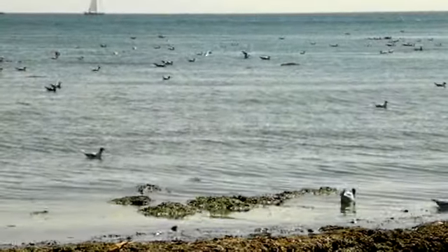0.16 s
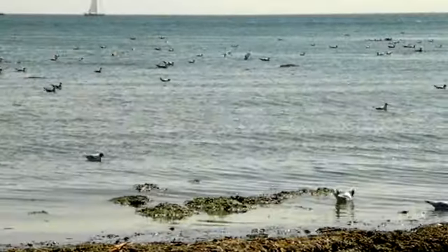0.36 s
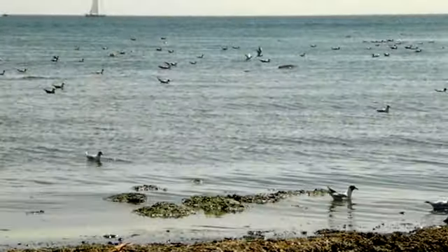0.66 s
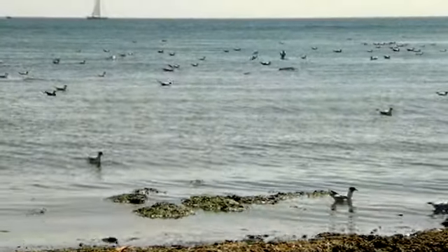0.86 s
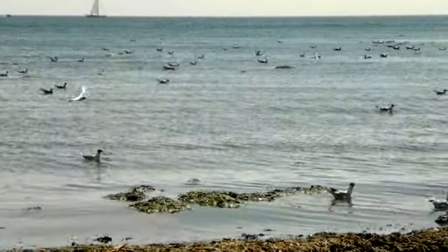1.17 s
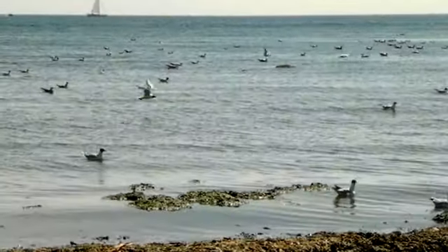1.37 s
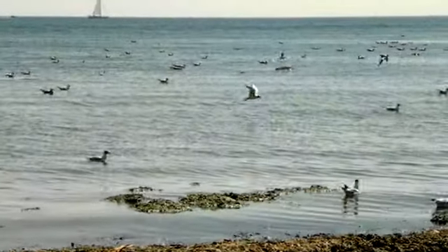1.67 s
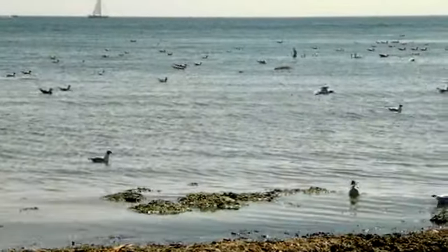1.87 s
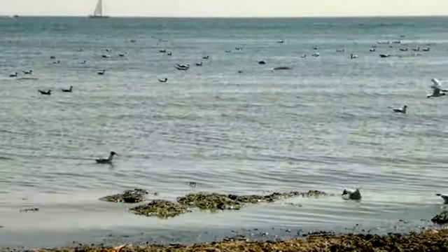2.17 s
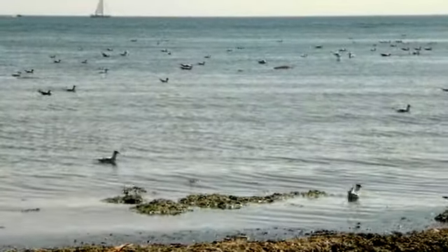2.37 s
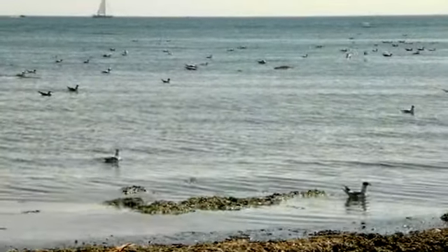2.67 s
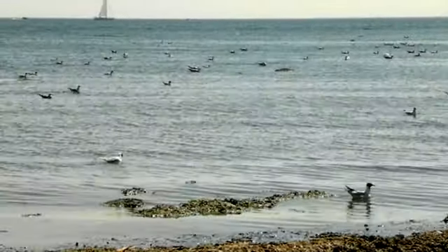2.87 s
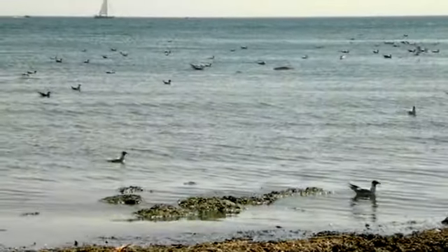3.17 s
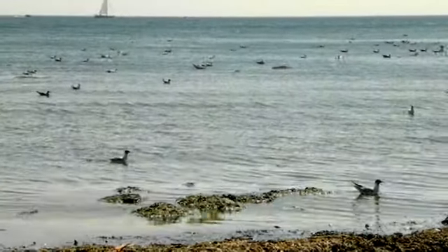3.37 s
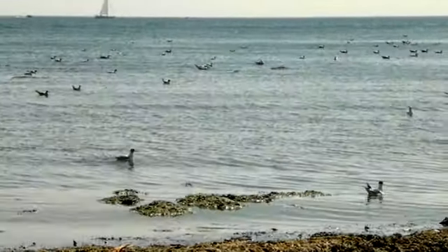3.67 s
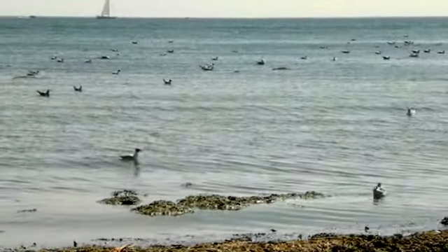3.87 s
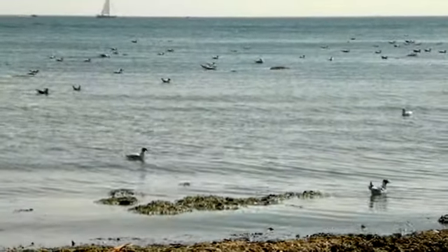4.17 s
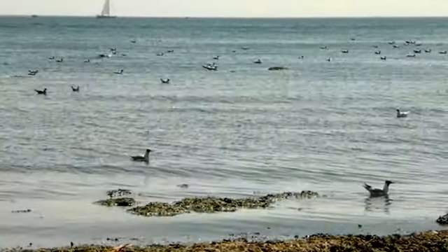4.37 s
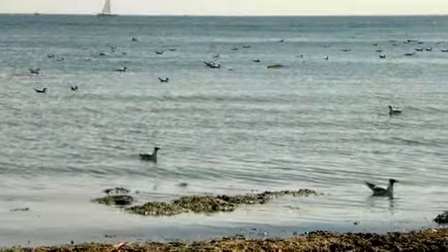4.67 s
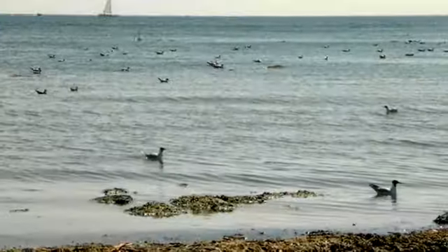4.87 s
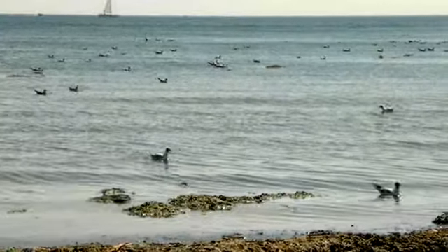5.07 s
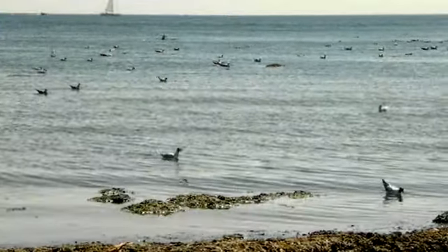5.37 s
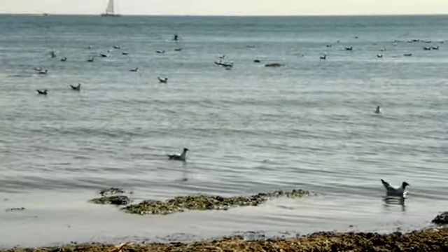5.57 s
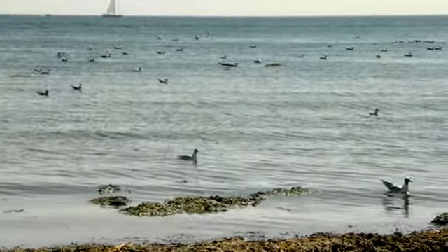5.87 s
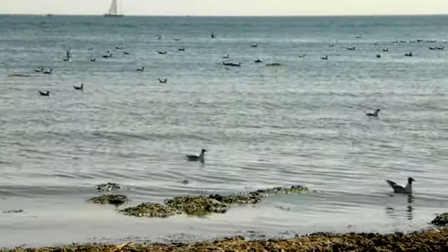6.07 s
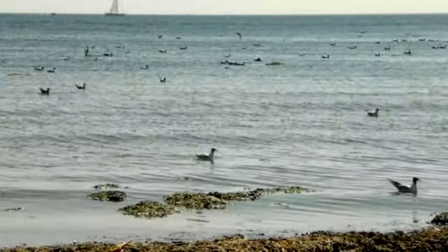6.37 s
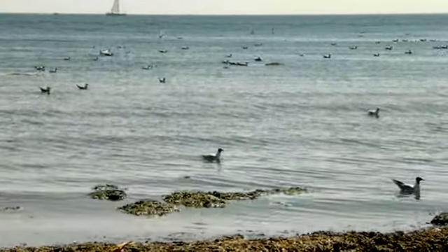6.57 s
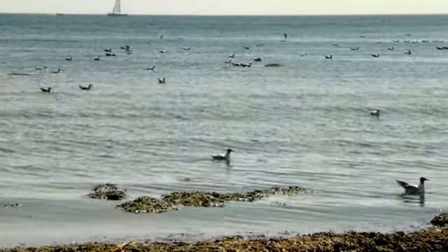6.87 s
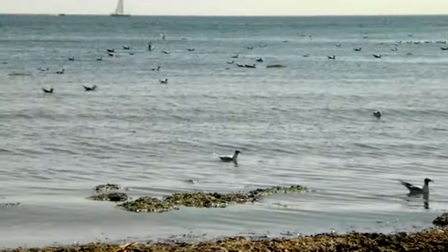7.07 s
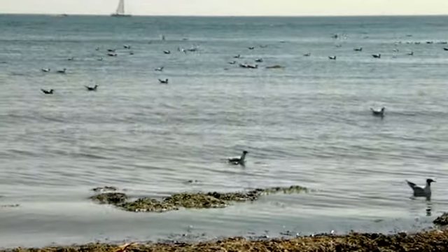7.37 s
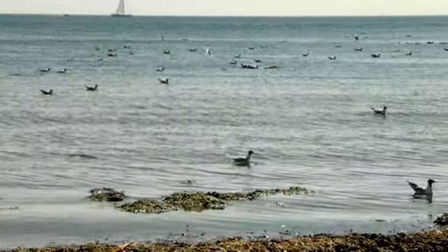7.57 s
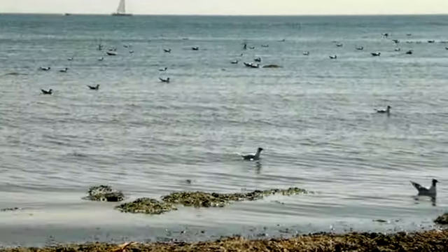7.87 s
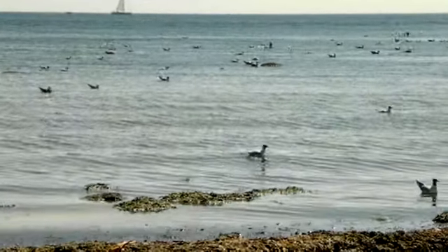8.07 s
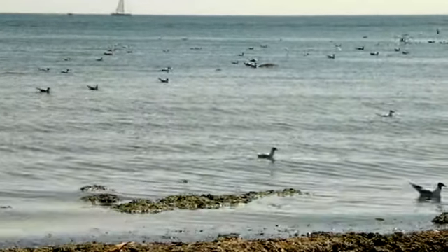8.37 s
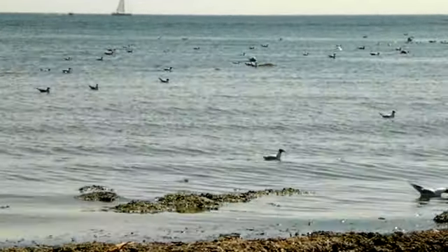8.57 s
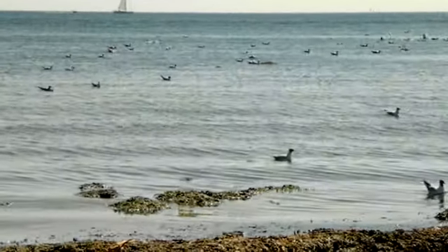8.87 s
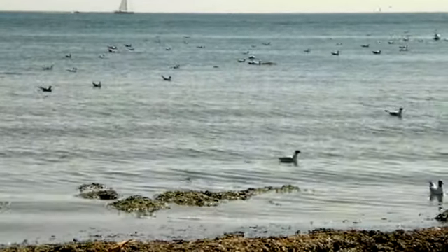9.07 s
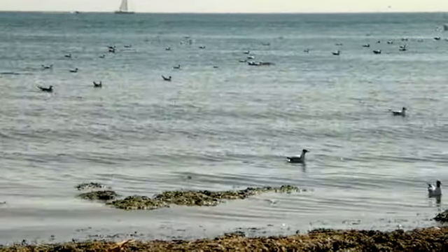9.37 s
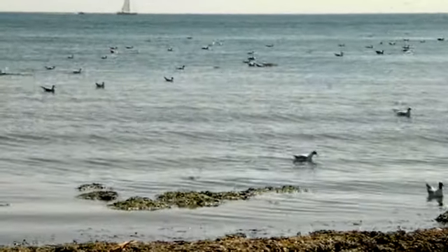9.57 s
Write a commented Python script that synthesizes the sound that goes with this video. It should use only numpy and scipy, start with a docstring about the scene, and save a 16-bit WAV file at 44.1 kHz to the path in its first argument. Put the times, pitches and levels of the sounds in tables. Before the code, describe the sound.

Harsh gull calls and high squeals carry over gentle shore ripples, while nearby stones knock sharply a few times.

```python
"""Gulls on calm sea off a pebble beach: rattling cries, a long laugh, a trill, barks and nasal wails,
with the whistles, squeals and hisses of young birds. The syrinx pulses to make the rattle; throat and
bill resonances shape the overtones. Hisses are air through a narrow throat. A few pebbles knock close by.
Behind: the far flock, ripples washing the shore and light wind on the microphone."""
import sys
import numpy as np
from scipy import signal
from scipy.fft import rfft, irfft, next_fast_len
from scipy.io import wavfile
from scipy.ndimage import uniform_filter1d, map_coordinates

SR = 44100
rng = np.random.default_rng(int(sys.argv[2]) if len(sys.argv) > 2 else 0)


def dump(signal):
    """Clip the signal to [-1, 1] and save it as 16-bit WAV at the path in sys.argv[1]."""
    limited = np.clip(np.atleast_2d(signal).T, -1, 1)
    pcm = np.round(limited * 32767).astype(np.int16)
    wavfile.write(sys.argv[1], SR, pcm)


N = 428211

# rattling cries: (time [s], length [s], attack [s], level [dB], 2nd harmonic at start [Hz], middle [Hz],
# end [Hz], rattle [Hz], pitch swing [ratio], roughness [0-1], brightness [dB])
CRIES = [(0.783, 0.28, 0.2, -40.5, 1913, 2060, 1895, 69.8, 0.13, 0.34, 4),
         (0.99, 0.15, 0.019, -35.5, 1796, 1718, 1674, 72.3, 0.095, 0.23, -7),
         (1.367, 0.2, 0.0088, -35, 1700, 1802, 1710, 74.3, 0.26, 0.16, -38),
         (3.242, 0.38, 0.056, -40.5, 1883, 1996, 1721, 69.6, 0.034, 0.24, 4.5),
         (3.344, 0.18, 0.046, -37.5, 1920, 2050, 1920, 66.8, .025, 0.14, 15.5),
         (6.689, 0.23, .02, -34.5, 2164, 1990, 1966, 66.2, 0.17, 0.29, 4),
         (6.799, .22, 0.03, -30.5, 1790, 1662, 1620, 66.2, 0.065, 0.18, -29),
         (7.03, 0.17, 0.032, -35, 1640, 1906, 1985, 81, 0.03, 0.25, 8),
         (7.181, 0.12, 0.011, -47, 1830, 1698, 1470, 80.3, 0.017, 0.09, 9.5),
         (9.087, 0.27, 0.058, -41.5, 1846, 1892, 1770, 97.7, 0.071, 0.14, -32)]
# nearest gull's laugh: (time [s], 2nd harmonic [Hz], relative level [dB])
LAUGH = [(4.65, 2084, -47), (4.682, 1780, -31.5), (4.712, 2037, -31), (4.768, 2247, -31.5),
         (4.792, 1780, -34), (4.83, 1998, -23.5), (4.86, 1905, -25.5), (4.869, 2053, -36),
         (4.884, 2106, -26), (4.938, 2124, -23.5), (4.951, 1845, -33), (4.971, 2042, -25.5),
         (4.981, 2086, -30.5), (4.995, 1928, -23.5), (5.025, 2280, -27), (5.05, 1985, -27),
         (5.105, 1840, -49)]
# throat and bill response: (frequency [Hz], gain [dB])
THROAT = [(250, -42), (900, -17), (1250, -28.5), (1600, 0), (2250, 6.5), (2900, -10.5), (3400, -2),
          (4400, -8.5), (5200, -23), (6700, -19), (9500, -28.5), (14000, -50)]
# sharper resonances with the bill wide open: (frequency [Hz], gain [dB])
OPEN_BILL = [(400, -20), (1700, 8), (2250, -2.5), (2700, -12), (3450, 0), (4050, -6.5), (4600, 0.5)]
# falling trill: (time [s], pitch [Hz], level [dB], pitch swing [ratio])
TRILL = [(7.758, 2010, -28.5, 0.23), (7.89, 2180, -25, 0.2), (8.05, 2035, -28.5, 0.096),
         (8.12, 1840, -35.5, .1), (8.19, 1470, -54, 0.078)]
# barks and yaps: (time [s], hold [s], pitch [Hz], level [dB])
BARKS = [(0.224, 0.036, 1090, -38), (1.15, 0.033, 824, -25), (1.56, 0.017, 1150, -29),
         (3.961, 0.035, 1050, -39), (4.157, 0.022, 957, -35.5), (4.331, 0.035, 1100, -49),
         (4.424, 0.038, 1080, -42.5), (5.869, 0.034, 924, -25), (6.516, 0.031, 1014, -25.5),
         (6.648, 0.032, 868, -21), (7.361, 0.013, 1140, -38.5), (7.624, 0.023, 871, -25.5),
         (8.94, 0.038, 926, -22)]
# nasal wails: (throat resonance [Hz], rows of (time [s], pitch [Hz], level [dB]))
WAILS = [(2010, [(2.58, 302, -41), (2.65, 321, -39), (2.74, 321, -40), (2.77, 305, -44), (2.87, 308.3, -44),
         (2.93, 330, -47)]), (2130, [(7.92, 352.3, -40), (8.15, 364, -35), (8.47, 358.2, -38.5),
         (8.58, 371, -41.5), (8.67, 352, -51)]), (2080, [(9.24, 353, -53), (9.29, 357, -39),
         (9.5, 390, -35.5), (9.56, 415.4, -31.5), (9.71, 403.6, -34)])]
# whistles: (time [s], length [s], level [dB], pitch at start [Hz], middle [Hz], end [Hz], octave [dB])
WHISTLES = [(0.197, 0.52, -42.5, 2233, 2150, 1945, -37), (0.409, 0.34, -49, 3880, 4210, 4090, -24),
            (0.51, 0.1, -59, 5570, 5560, 5560, -30), (1.03, 0.36, -53.5, 4640, 4420, 4100, 1.5),
            (1.561, 0.032, -29.5, 2280, 2390, 2580, -12), (2.062, 0.12, -42.5, 2200, 2125, 1930, -18),
            (3.101, 0.08, -41, 2260, 2190, 2010, -24), (4.062, 0.1, -43.5, 4270, 4100, 3900, -29),
            (4.53, 0.11, -48.5, 3380, 3670, 3900, -19), (5.301, 0.52, -55, 2935, 2720, 2560, -30),
            (5.891, 0.16, -42.5, 2180, 1970, 1880, -26), (6.397, 0.44, -52.5, 4620, 4640, 4200, 0),
            (7.384, 0.32, -42, 3840, 3954, 3770, -28), (8.521, .295, -38, 4000, 4066, 3650, -21)]
# breaking squeals, one list each: (time [s], pitch [Hz], relative level [dB])
SQUEALS = [
    [(1.548, 3520, -32), (1.585, 3640, -44), (1.62, 4340, -33.5), (1.651, 4870, -44), (1.681, 4300, -31.5),
     (1.718, 4380, -33.5), (1.806, 3370, -40)],
    [(8.457, 4200, -41), (8.476, 3790, -42), (8.502, 4390, -29), (8.515, 4950, -43), (8.554, 5150, -41),
     (8.58, 4590, -32), (8.608, 4810, -38), (8.634, 4390, -27), (8.748, 3520, -46.5)],
]
# begging rasps and faint thin hisses: (time [s], length [s], level [dB], throat tuning [ratio])
RASPS = [(2.89, 0.32, -37, 1.02), (7.455, 0.31, -37, 1.01)]
HISSES = [(2.24, 0.68, -53, 1.04), (4.93, 1, -52, 0.99), (8.14, 0.48, -56, .84)]
# their throat spectra before tuning: (frequency [Hz], gain [dB])
RASP_SPECTRUM = [(1000, -20), (2100, 4), (3100, -16.5), (3800, -21), (4700, -6.5), (5200, -10), (5700, 5),
                 (6300, -16), (6700, -3), (7800, -12), (9300, -5), (10700, -13.5), (12500, -33)]
HISS_SPECTRUM = [(1500, -11), (4000, 4), (6700, -2), (9600, -6), (10400, 1), (11300, -8), (13500, -26)]
# pebble knocks: (time [s], level [dB], body note [Hz], hard modes and crack re body [dB])
KNOCKS = [(2.1825, -11, 625, 8.5), (2.581, -11, 1090, 7.5), (2.584, -17.5, 910, 3.5),
          (5.3924, -15, 840, 2.5), (5.783, -21.5, 780, -19)]
# hard pebble modes: (frequency [Hz], gain [dB], T60 [s])
PEBBLE_MODES = [(1450, -13, 0.01), (2130, -6.5, 0.018), (2456, -6, 0.013), (3660, -1, 0.0012),
                (8100, -10.5, 0.0027)]
# excited bouts of the far flock: (time [s], length [s], relative level [dB])
FLOCK_BOUTS = [(0.3, 1.33, -56), (3.33, 0.87, -44), (6.603, 1.43, -50)]
# shore wash: (time [s], relative level [dB])
WASH = [(0.0, -49.5), (0.57, -50.5), (0.97, -45.5), (1.73, -52), (3.16, -54), (3.92, -45.5), (4.19, -52),
        (6.71, -49.5), (8.9, -51.5), (9.71, -47.5)]
# wind gusts: (peak time [s], Gaussian sigma [s], level [dB])
GUSTS = [(2.3, 0.58, -50), (7.8, 0.6, -57), (9.7, 0.42, -56)]
# water and wind spectra: (frequency [Hz], gain [dB])
SEA_SPECTRUM = [(195, -24.5), (290, -10), (550, -7), (850, 1), (1300, -1.5), (2000, 5), (3000, -7),
                (6000, -20.5), (11000, -26.5)]
WIND_SPECTRUM = [(25, -17.5), (70, -2.5), (120, -1.5), (190, -20), (310, -9), (600, -17.5), (1500, -61)]


def cries(depth=0.68, release_share=0.27, fade_db=8.5):
    """Rattling cries: the throat favours the 2nd harmonic; pitch swing shrinks as effort dies."""
    out = np.zeros(N)
    for start_s, length_s, attack_s, db, *contour_hz, rattle_hz, swing, rough, bright_db in CRIES:
        effort = amp(envelope_db(length_s, attack_s, release_share * length_s, fade_db))
        pitch_hz = glide(len(effort), *contour_hz) / 2
        cry = voice(pitch_hz, rattle_hz, depth, swing * np.sqrt(effort), rough, bright_db)
        add(out, start_s, cry * effort * amp(db))
    return out


def voice(pitch_hz, rattle_hz, depth, swing, rough, bright_db, harmonics=10, uneven=0.042):
    """Harsh gull voice: pitch arches within each pulse and jitters as the membranes go chaotic."""
    n = len(pitch_hz)
    cycle, pulse = rattle(n, rattle_hz, depth, uneven)
    arch = np.sin(np.pi * cycle ** 1.9)
    jitter = .11 * (wander(n, 900) + wander(n, 110))
    phase = phase_rad(pitch_hz * (1 + swing * (arch - arch.mean()) + rough * jitter))
    odd_gain = np.minimum(3 * rough, 1)  # rough cycles alternate, filling in odd harmonics
    air = 2.6 * rough * rng.standard_normal(n)
    tone = sum(odd_gain ** (k % 2) * np.sin(k * phase) for k in range(1, harmonics + 1))
    cry = unit(colour((tone + air) * pulse, THROAT))
    # a wider bill passes more upper overtones
    return colour(cry, [(2500, 0), (3100, bright_db), (4600, bright_db), (5800, min(bright_db, 0) / 2)])


def rattle(n, rate_hz, depth, uneven=0.095):
    """The syrinx opens in quick pulses. Returns (position in pulse [0-1], gain)."""
    cycle = np.cumsum(rate_hz * (1 + uneven * wander(n, 56.6))) / SR % 1
    pulse = 1 - depth + depth * np.sin(np.pi * cycle)
    return cycle, pulse * amp(1.03 * wander(n, 78.9))


def laugh(gain_db=2, rattle_hz=91.7, crack_db=-24, rough_per_db=0.1):
    """Nearest gull: deep pulses, heaving pitch; the voice cracks where effort sags."""
    out = np.zeros(N)
    start_s, second_hz, db = curves(LAUGH)
    rough = np.clip(rough_per_db * (crack_db - db), .15, .33)
    cry = voice(second_hz / 2, rattle_hz, depth=1, swing=.16, rough=rough, bright_db=-10, uneven=.012)
    add(out, start_s, colour(cry, OPEN_BILL) * amp(db + gain_db))
    return out


def trill(rattle_hz=80, depth=0.66, skew=0.51, jitter=0.0143, overtones_db=-36):
    """Even, clear pulses, each a pitch stroke loudest early; strokes flatten as the voice sinks."""
    out = np.zeros(N)
    start_s, pitch_hz, db, swing = curves(TRILL)
    cycle, _ = rattle(len(db), rattle_hz, depth, uneven=0.018)
    stroke = -swing / 2 * np.cos(2 * np.pi * (cycle - .1))
    phase = phase_rad(pitch_hz * (1 + stroke + jitter * wander(len(db), 700)))
    tone = np.sin(phase) + amp(overtones_db) * (np.sin(2 * phase) + np.sin(3 * phase))
    pulse = 1 - depth + depth * np.sin(np.pi * cycle ** skew) ** 2
    add(out, start_s, unit(tone * pulse) * amp(db))
    return out


def barks(fall_per_s=1.2, release_s=.012, tail_s=0.0426):
    """A few hard pulses; the voice sinks and dies."""
    out = np.zeros(N)
    for start_s, hold_s, middle_hz, db in BARKS:
        t = np.arange(int((hold_s + tail_s) * SR)) / SR
        pitch_hz = middle_hz * np.exp(-fall_per_s * (t - hold_s / 2))
        bark = voice(pitch_hz, rattle_hz=88, depth=.85, swing=.12, rough=.36, bright_db=0.5)
        decay = np.exp(-np.maximum(t - hold_s, 0) / release_s)
        add(out, start_s, bark * amp(db) * decay, fade_s=0.0071)
    return out


def wails(jitter=0.0053, hoarse_jitter=0.031, break_hz=389, width_hz=410):
    """Low voices: only harmonics near the throat resonance escape; hoarse when pushed high."""
    out = np.zeros(N)
    for throat_hz, rows in WAILS:
        start_s, smooth_hz, db = curves(rows)
        shake = jitter + hoarse_jitter / (1 + np.exp((break_hz - smooth_hz) / 10))
        pitch_hz = smooth_hz * (1 + shake * wander(len(db), 380))
        phase = phase_rad(pitch_hz)
        tone = np.zeros(len(db))
        for k in range(2, 9):
            detune = (k * pitch_hz - throat_hz) / width_hz
            tone += np.sin(k * phase + k * k) / (1 + detune ** 2) ** 2
        add(out, start_s, unit(tone) * amp(db))
    return out


def whistles(droop=.055, droop_s=0.0302, waver=0.0044, waver_db=2, waver_hz=35):
    """Thin, arching whistles that waver, then droop as the air runs out."""
    out = np.zeros(N)
    for start_s, length_s, level_db, *contour_hz, octave_db in WHISTLES:
        db = level_db + envelope_db(length_s, 0.29 * length_s, 0.14 * length_s, fade_db=9)
        n = len(db)
        sag = droop * np.exp((np.arange(n) / SR - length_s) / droop_s)
        pitch_hz = glide(n, *contour_hz) * (1 + waver * wander(n, waver_hz) - sag)
        db += waver_db * wander(n, waver_hz)
        add(out, start_s, young_voice(pitch_hz, db, octave_db))
    return out


def squeals(gain_db=1.5, octave_db=-30, break_s=.045, width_s=.06):
    """A young voice forced until it breaks: rough on the climb, clear on the fall."""
    out = np.zeros(N)
    for rows in SQUEALS:
        start_s, pitch_hz, db = curves(rows)
        t = np.arange(len(db)) / SR
        rough = .035 * np.exp(-((t - break_s) / width_s) ** 2)
        add(out, start_s, young_voice(pitch_hz, db + gain_db, octave_db, rough))
    return out


def young_voice(pitch_hz, db, octave_db, rough=0, jitter=0.0028, flutter_db=2):
    """Quavering tone plus its octave; rasps when forced."""
    n = len(db)
    quaver = 1 + jitter * wander(n, 350.5) + rough * wander(n, 1800)
    phase = phase_rad(uniform_filter1d(pitch_hz, size=200) * quaver)
    tone = np.sqrt(2) * (np.sin(phase) + amp(octave_db) * np.sin(2 * phase))
    return tone * amp(db + flutter_db * wander(n, 87.2))


def hisses(rows, spectrum, attack_s, release_s, rattle_hz, depth, arch=.07):
    """Toneless air through a narrow throat whose resonances rise and sink with the call."""
    out = np.zeros(N)
    for start_s, length_s, level_db, tuning in rows:
        db = level_db + envelope_db(length_s, attack_s, release_s, fade_db=19)
        n = len(db)
        _, pulse = rattle(n, rattle_hz, depth)
        air = colour(rng.standard_normal(2 * n), spectrum)
        speed = tuning * glide(n, 1 - arch, 0.99, 1 - arch)
        air = map_coordinates(air, [np.cumsum(speed)])  # read speed shifts the resonances
        add(out, start_s, unit(air * pulse ** 2) * amp(db))
    return out


def pebbles(body_t60_s=0.012, crack_db=-14, crack_s=0.0011):
    """Stones knock together: hollow body note, short hard modes and a crack."""
    out = np.zeros(N)
    t = np.arange(int(.04 * SR)) / SR

    def ring(hz, t60_s):
        return np.sin(2 * np.pi * hz * t) * np.exp(-np.log(1000) * t / t60_s)

    hard = sum((-1) ** k * amp(db) * ring(hz, t60_s) for k, (hz, db, t60_s) in enumerate(PEBBLE_MODES))
    for start_s, db, body_hz, hard_db in KNOCKS:
        crack = amp(crack_db) * rng.standard_normal(len(t)) * np.exp(-t / crack_s)
        knock = ring(body_hz, body_t60_s) + amp(hard_db) * (hard + crack)
        add(out, start_s, amp(db) * knock, fade_s=0)
    return signal.sosfilt(signal.butter(3, [330, 10500], "band", fs=SR, output="sos"), out)


def far_flock(calls=75, base_hz=950, spread=.15, distance_db=11):
    """Far birds at varied distances, short yaps to long cries, each an arch in pitch and level."""
    out = np.zeros(N)
    for k, (offset, length, height, rate, distance) in enumerate(rng.random((calls, 5))):
        length_s = .1 + .4 * length
        arch = np.sin(np.linspace(0, np.pi, int(length_s * SR)))
        pitch_hz = base_hz * (1 + spread * (2 * height - 1)) * (.86 + .18 * arch)
        rattle_hz = 65 + 40 * rate
        cry = voice(pitch_hz, rattle_hz, depth=0.74, swing=0.028, rough=0.12, bright_db=-2, harmonics=5)
        start_s = (k + offset) / calls * N / SR
        add(out, start_s, arch * cry * amp(-distance_db * distance))
    return unit(out)


def excitement(calm_db=-51.5):
    """Far-flock gain: a calm murmur with excited bouts on top."""
    gain = np.full(N, amp(calm_db))
    for start_s, length_s, db in FLOCK_BOUTS:
        swell_db = envelope_db(length_s, attack_s=0.25, release_s=0.04, fade_db=-3)  # ends 3 dB up
        add(gain, start_s, amp(db + swell_db), fade_s=0.09)
    return gain


def ripples(flicker_db=2.15, bubble_db=-9, bubbles_per_s=250):
    """Ripples wash the shore: a soft rush with small bursting bubbles."""
    bubbles = (rng.random(N) < bubbles_per_s / SR) * rng.standard_normal(N)
    rush = rng.standard_normal(N) * amp(flicker_db * wander(N, 18))
    return unit(colour(rush + amp(bubble_db) * unit(bubbles), SEA_SPECTRUM))


def wind(breeze_db=-69.5):
    """A breeze rumbles on the microphone; Gaussian gusts add in power."""
    t = np.arange(N) / SR
    power = amp(breeze_db) ** 2
    for peak_s, sigma_s, db in GUSTS:
        power += (amp(db) * np.exp(-.5 * ((t - peak_s) / sigma_s) ** 2)) ** 2
    return unit(colour(rng.standard_normal(N), WIND_SPECTRUM)) * np.sqrt(power)


def beach_scatter(x, scatter_db=-17, t60_s=0.096, delay_s=.002):
    """Water and shingle scatter a short, dull tail."""
    t = np.arange(int(.3 * SR)) / SR
    noise = colour(rng.standard_normal(len(t)), [(3000, 16), (10000, -29)])
    tail = noise * np.exp(-np.log(1000) * t / t60_s) * (t > delay_s)
    return x + amp(scatter_db) * signal.fftconvolve(x, tail / np.linalg.norm(tail))[:N]


def amp(db):
    return 10 ** (np.asarray(db) / 20)


def unit(x):
    return x / np.sqrt(np.mean(x ** 2) + 1e-18)


def phase_rad(hz):
    return 2 * np.pi * np.cumsum(hz) / SR


def colour(x, spectrum):
    """Filter by (frequency [Hz], gain [dB]) points."""
    hz, db = np.transpose(spectrum)
    size = next_fast_len(len(x) + 512)
    bins_hz = np.maximum(np.fft.rfftfreq(size, 1 / SR), 1)
    gain = amp(np.interp(np.log(bins_hz), np.log(hz), db))
    return irfft(rfft(x, size) * gain, size)[:len(x)]


def wander(n, rate_hz):
    """Interpolated noise, standard deviation about 1."""
    position = np.arange(n) * rate_hz / SR
    knots = int(position[-1]) + 2
    return 1.2 * np.interp(position, np.arange(knots), rng.standard_normal(knots))


def envelope_db(length_s, attack_s, release_s, fade_db):
    """Attack, hold at 0 dB, release; the ends lie at -fade_db."""
    t = np.arange(int(length_s * SR)) / SR
    return -fade_db * (np.maximum(1 - t / attack_s, 0) + np.maximum(1 - (length_s - t) / release_s, 0))


def glide(n, first, middle, last):
    """Parabola through three values."""
    u = np.linspace(0, 1, n)
    return first + (last - first) * u + (2 * middle - first - last) * 2 * u * (1 - u)


def curves(rows):
    """Start time [s], then each further column per sample."""
    times_s, *columns = np.transpose(rows)
    t = np.arange(times_s[0], max(times_s[-1], times_s[0] + .02), 1 / SR)
    return [times_s[0]] + [np.interp(t, times_s, column) for column in columns]


def add(out, start_s, x, fade_s=0.0012):
    """Mix in with faded ends."""
    i, k = max(int(start_s * SR), 0), np.arange(len(x))
    x = x * np.clip(np.minimum(k + 1, len(x) - k) / (fade_s * SR + 1), 0, 1)
    out[i:i + len(x)] += x[:max(N - i, 0)]


def scene(wash_gain_db=6, flock_gain_db=-2):
    """Near gulls over pebbles, far flock, ripples and wind; mono."""
    t = np.arange(N) / SR
    rasps = hisses(RASPS, RASP_SPECTRUM, attack_s=0.064, release_s=.12, rattle_hz=104.1, depth=0.6)
    thin = hisses(HISSES, HISS_SPECTRUM, attack_s=0.074, release_s=0.2, rattle_hz=92, depth=0.11)
    gulls = cries() + laugh() + trill() + barks() + wails() + whistles() + squeals() + rasps + thin
    flock = far_flock() * excitement() * amp(flock_gain_db)
    water = ripples() * amp(np.interp(t, *np.transpose(WASH)) + wash_gain_db)
    return (beach_scatter(gulls + flock) + pebbles() + water + wind())[None]


def record(dry, notch_hz=7930, notch_q=9, cutoff_hz=15750):
    """Microphone: narrow treble notch, steep low-pass."""
    notched = signal.lfilter(*signal.iirnotch(notch_hz, notch_q, fs=SR), dry)
    return signal.sosfilt(signal.ellip(8, .2, 70, cutoff_hz, fs=SR, output="sos"), notched)


dry = scene()
out = record(dry)
dump(out)
```